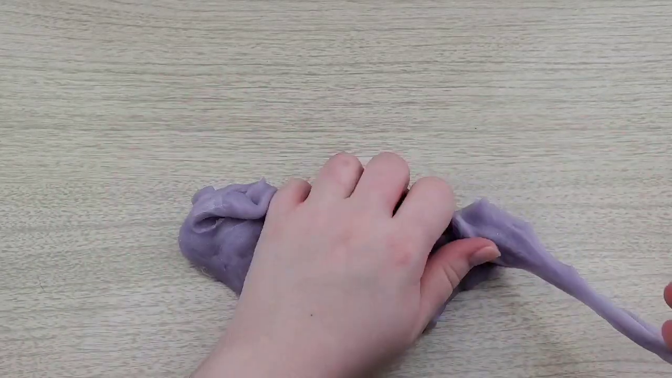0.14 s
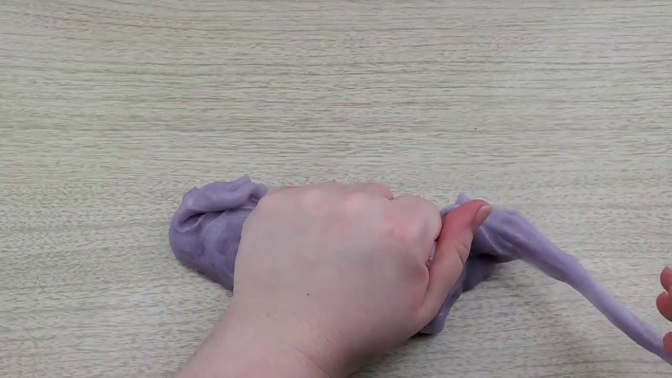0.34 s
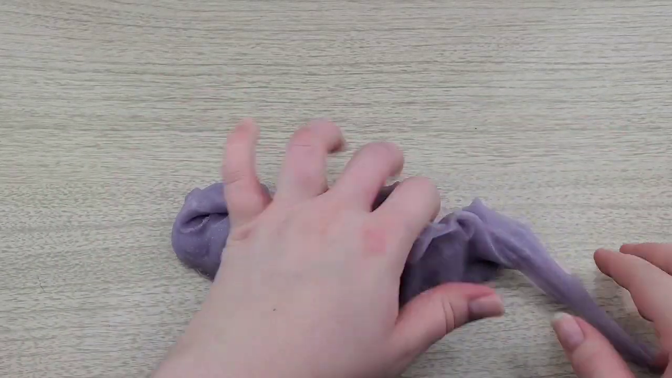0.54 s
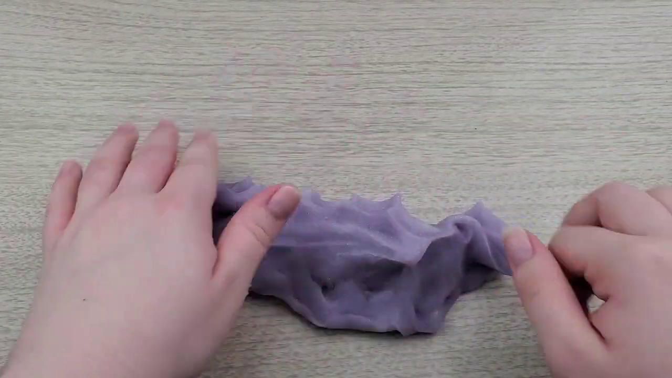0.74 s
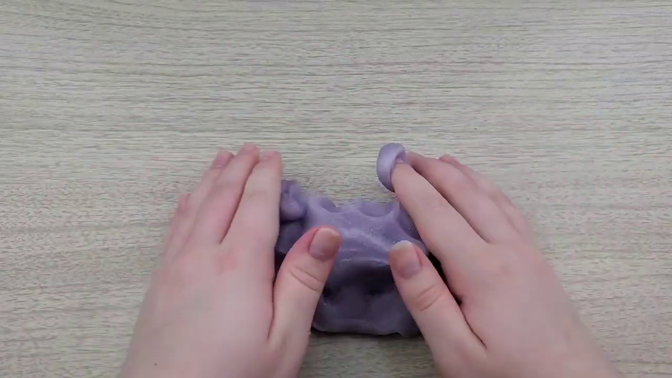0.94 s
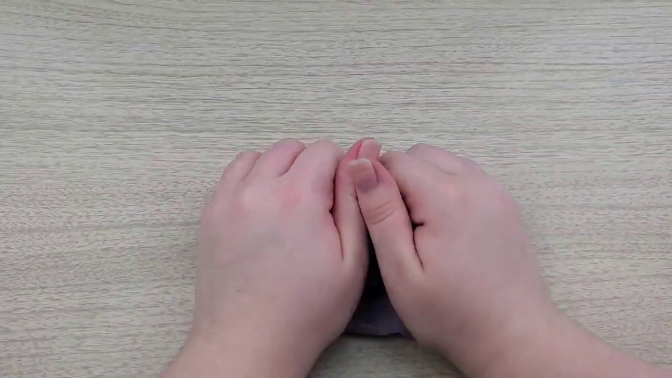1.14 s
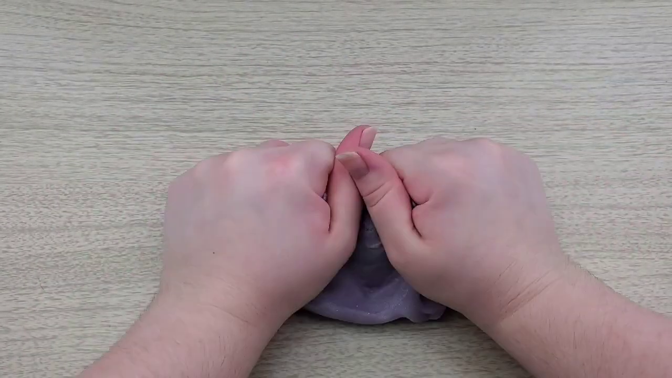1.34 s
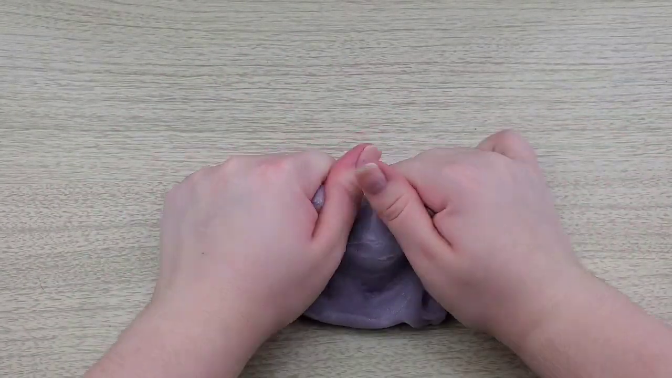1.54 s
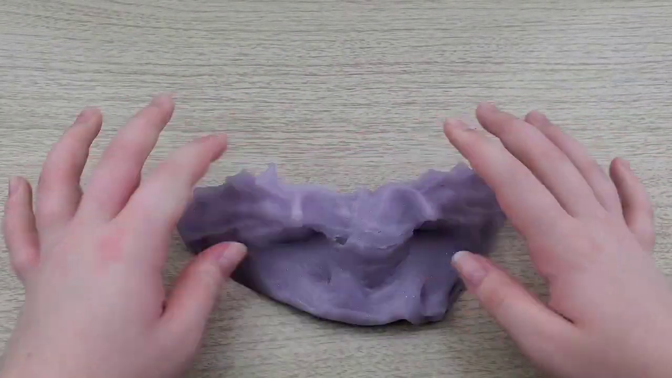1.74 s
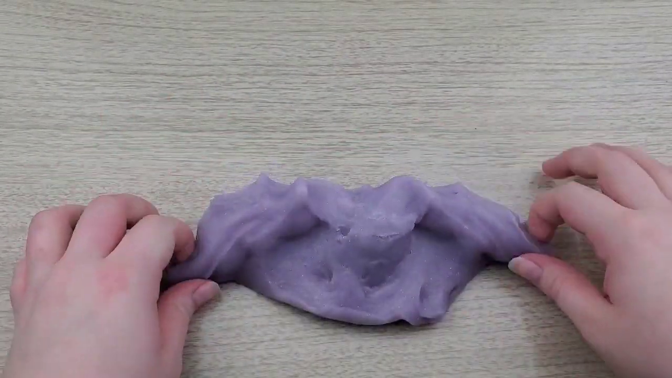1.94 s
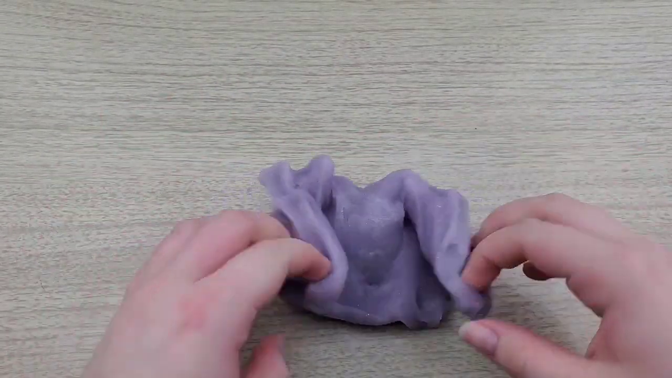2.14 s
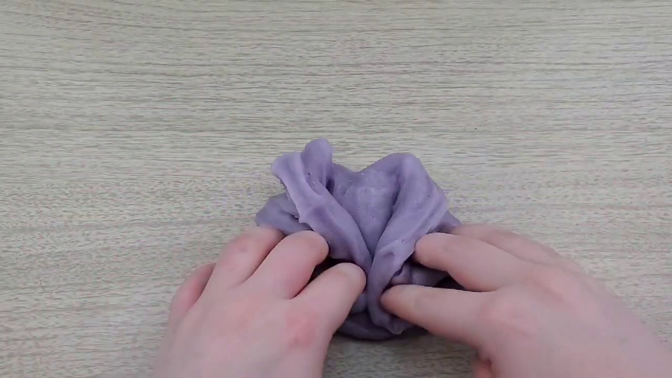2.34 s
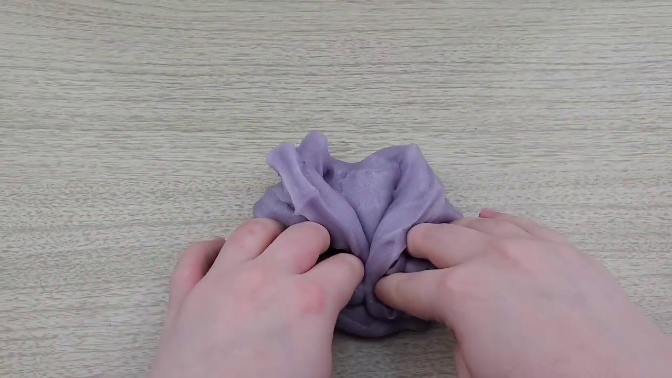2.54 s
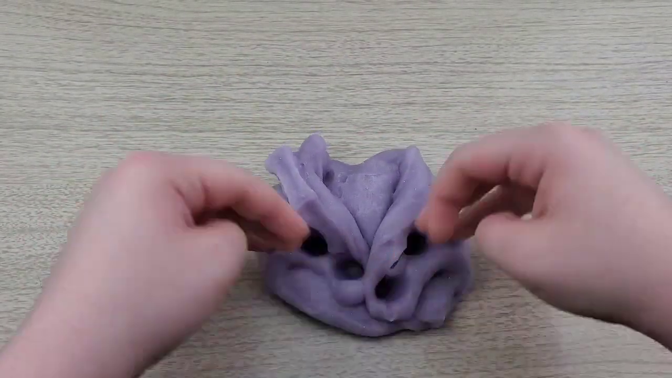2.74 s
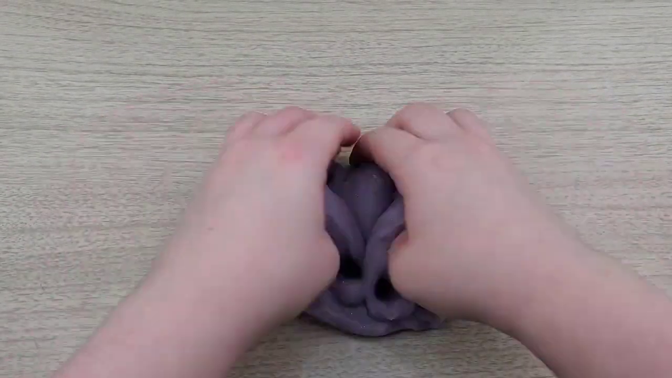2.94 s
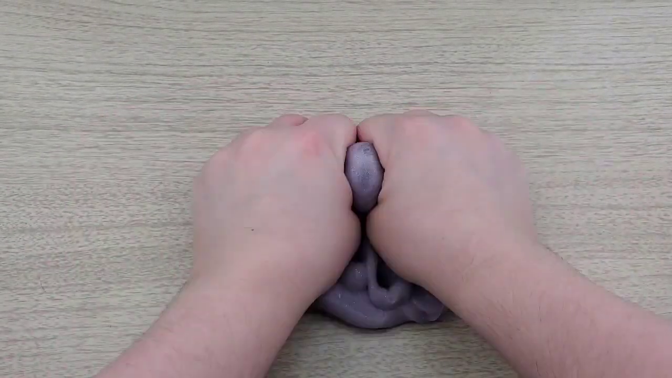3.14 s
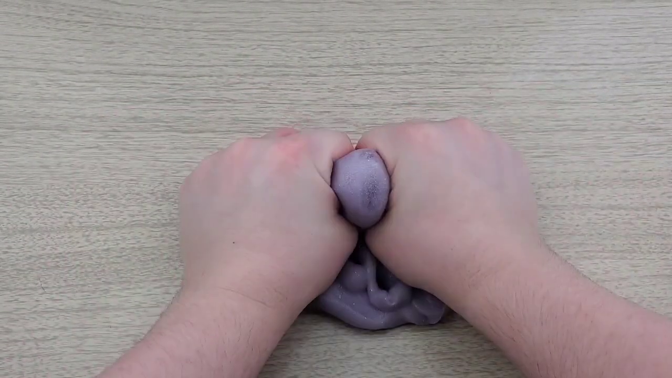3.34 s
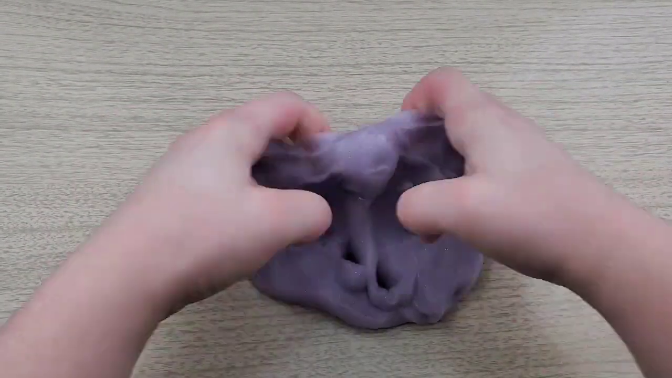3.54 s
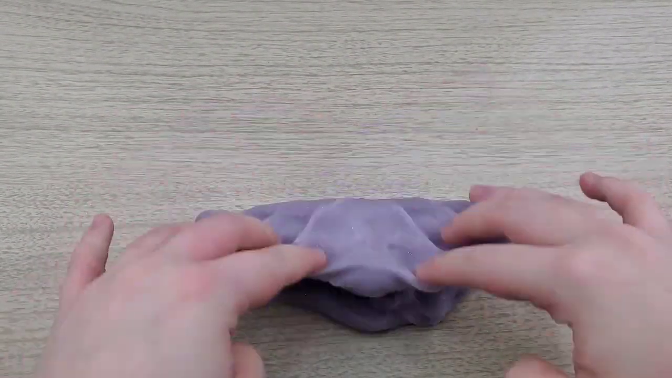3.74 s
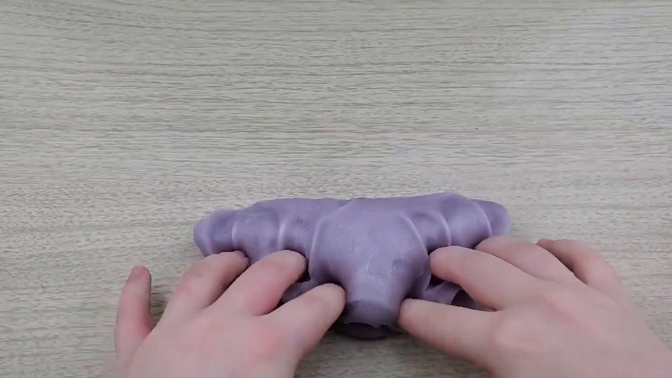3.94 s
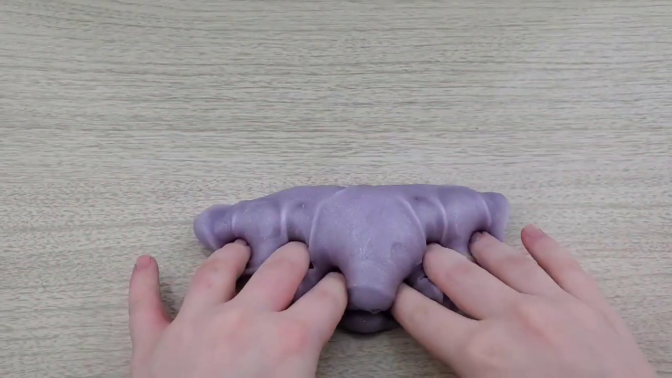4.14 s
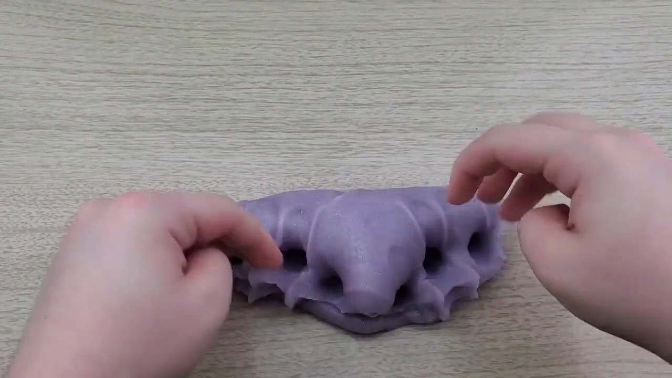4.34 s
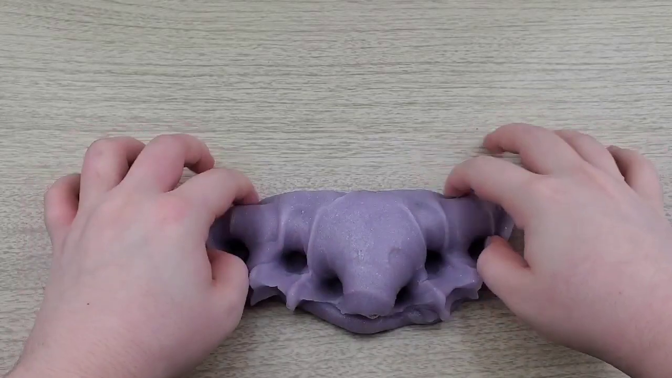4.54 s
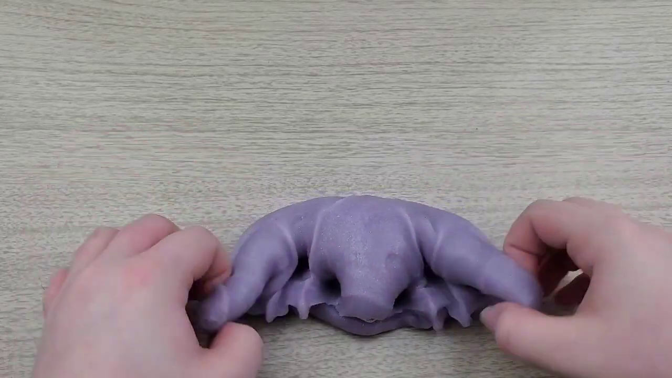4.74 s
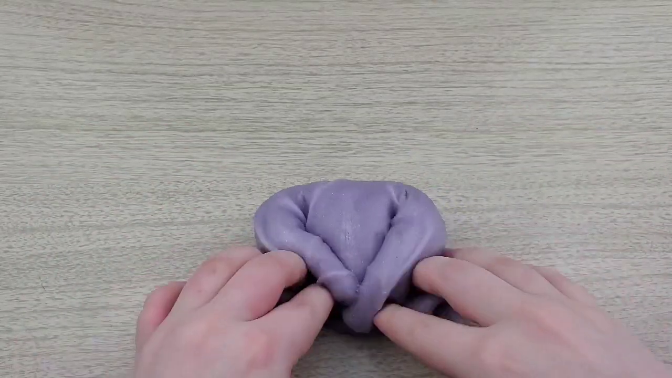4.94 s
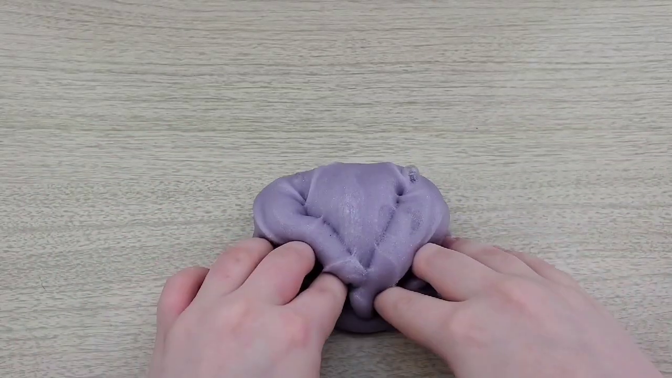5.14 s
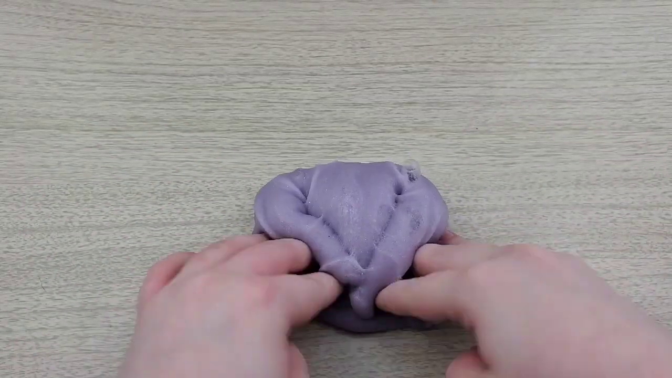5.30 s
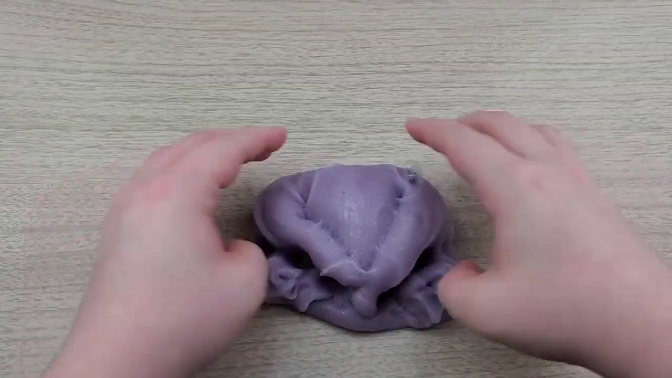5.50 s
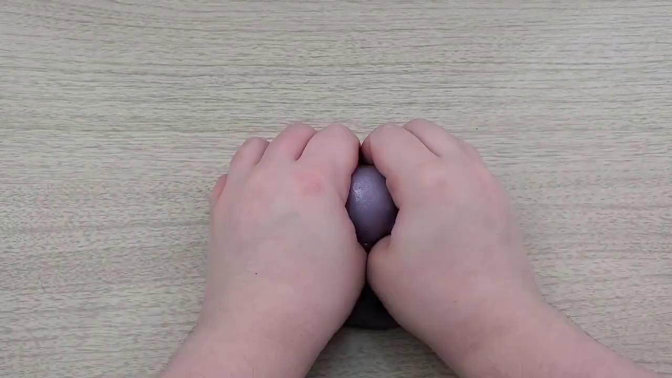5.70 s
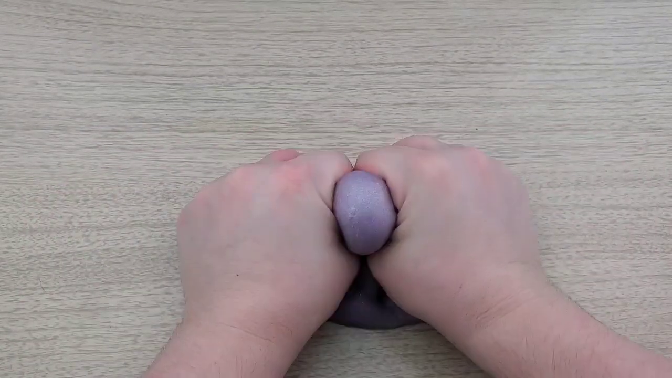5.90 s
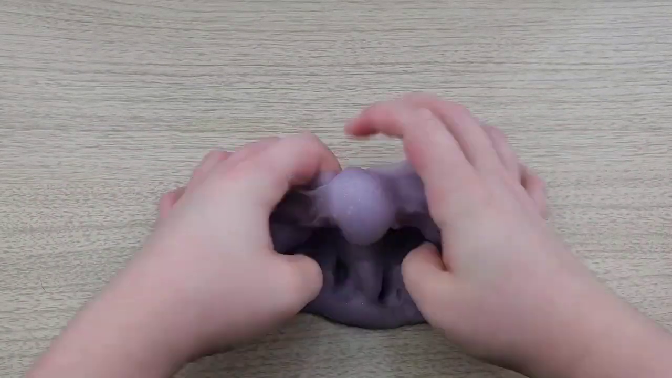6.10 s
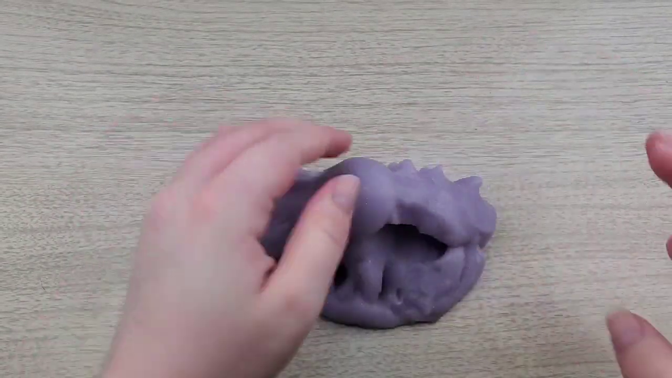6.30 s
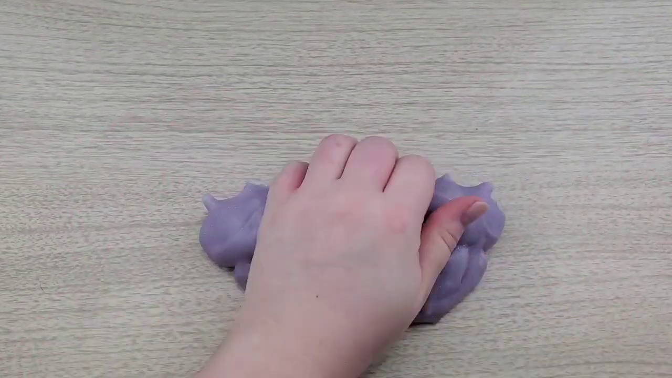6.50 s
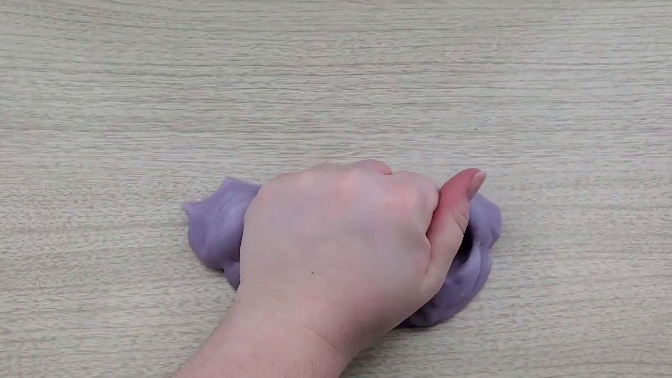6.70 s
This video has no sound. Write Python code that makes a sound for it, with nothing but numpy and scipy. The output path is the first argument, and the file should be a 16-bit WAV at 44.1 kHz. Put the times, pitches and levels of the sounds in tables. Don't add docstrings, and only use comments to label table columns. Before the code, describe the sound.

A close stereo microphone in a small quiet room catches hands working thick slime on a wooden table. After a nearly silent start, a dense cluster of loud wet snaps and pops bursts at 0.35-0.55 s with a soft table knock. Bubbly squish follows around 0.7 s, a pop at 1.26, fine crackles at 1.4-1.65 and a small bubbling squelch at 1.8. It is very quiet, with tiny ticks, until sharp pops at 2.9 s. Low thumps and blister crackles lead to snaps at 3.3-3.4 and a sticky, hollow squelch at 3.6-3.75. Another quick pop group lands at 4.45-4.5, faint seeping follows, then pops at 5.5. The loudest, juiciest bursts come at 5.9-6.1, with peeling and bubbles to 6.3. A last squish and snap arrive at 6.8-6.85 over faint hum and rumble.

```python
import sys
import numpy as np
from scipy import signal
from scipy.fft import rfft, irfft
from scipy.io import wavfile
from scipy.ndimage import uniform_filter1d

SR = 44100
rng = np.random.default_rng(int(sys.argv[2]) if len(sys.argv) > 2 else 0)


def amplitude_ratio(level_db):
    exponent = np.asarray(level_db, float) / 20
    return 10 ** exponent


def store_wav(level_fs):
    pcm = np.round(np.clip(np.atleast_2d(level_fs), -1, 1) * 32767)
    wavfile.write(sys.argv[1], SR, pcm.T.astype(np.int16))


N = 302526
MILLIS = np.arange(0, N / SR + .01, .001)
PORT_LAG_S = .00008
GESTURE_ROUND = 2.2
MIRROR = np.array([[1], [-1]])


def band(x, lo_hz, hi_hz, order=2):
    sos = signal.butter(order, [lo_hz, min(hi_hz, .47 * SR)], "band", fs=SR, output="sos")
    return signal.sosfilt(sos, x)


def fade(t60_s, size):
    return np.exp(-np.log(1000) * np.arange(size) / (t60_s * SR))


def unit(x):
    return x / np.sqrt(np.mean(x ** 2))


def add(out, start_s, x, peak_db):
    travel_s = .0008
    i = int((start_s + travel_s) * SR)
    x = x[..., :N - i]
    out[:, i:i + x.shape[-1]] += amplitude_ratio(peak_db + 4.0) * x / np.abs(x).max(1).mean()


def walk(rate_hz):
    k = int(SR / rate_hz)
    steps = np.repeat(rng.standard_normal(N // k + 1), k)
    smooth = uniform_filter1d(uniform_filter1d(steps, k), k)
    return unit(smooth[:N])


def crackle(per_s, spread_db, apart, wash):
    hits = rng.random((3, N)) < per_s / SR
    size_db = spread_db * np.minimum(rng.exponential(size=(3, N)), 3)
    clicks = hits * amplitude_ratio(size_db) * np.clip(rng.standard_normal((3, N)), -2, 2)
    clicks = unit(clicks) + wash * rng.standard_normal((3, N))
    return clicks[0] + apart * clicks[1:]


def humps(peak_s, swell_s, fade_s, level_db, round_top):
    late_s = MILLIS - peak_s[:, None]
    span = np.where(late_s < 0, -late_s / swell_s[:, None], late_s / fade_s[:, None])
    return amplitude_ratio(level_db[:, None] - 20 * span ** round_top)


def control(gain):
    return np.interp(np.arange(N) / SR * 1000, np.arange(len(gain)), gain)


def air(t):
    # freq_hz, density_db (per Hz)
    spectrum = np.array([(15, -45.5), (25, -16), (41, -3), (65, -7), (95, -14.5), (159, -30), (238, -17.5),
                         (296, -14.5), (410, -32), (1120, -57), (16500, -61)])
    # freq_hz, level_db
    hum_lines = [(190, -88.5), (238, -89), (286, -85)]
    tone_db = -75.5 + 1.0
    f_hz = np.fft.rfftfreq(N, 1 / SR) + 1
    shape = amplitude_ratio(np.interp(np.log(f_hz), np.log(spectrum[:, 0]), spectrum[:, 1]))
    mid, side = rfft(rng.standard_normal((2, N))) * shape
    tone = irfft(mid + np.clip(f_hz / 1500, .15, 1) * side * MIRROR, N)
    hum = 0
    for hz, level_db in hum_lines:
        gain = amplitude_ratio(level_db + 7.5 + 0.76 * walk(8.2))
        hum = hum + gain * np.sin(2 * np.pi * hz * t + 0.44 * walk(1.4))
    return unit(tone) * amplitude_ratio(tone_db) + hum


def peel():
    # peak_s, swell_s, fade_s, crackle_db, hollow_db (re crackle)
    peels = [(0.005, 0.071, 0.053, -83.5, -4), (.335, 0.034, 0.065, -77, -7), (0.488, 0.098, 0.12, -46, -5),
             (1.081, 0.057, 0.074, -86.5, -31), (0.70, 0.065, 0.084, -59.5, 5.5),
             (0.763, 0.083, 0.041, -59, -3), (1.249, 0.14, 0.099, -74.5, -14), (1.55, 0.37, 0.11, -64, -2),
             (1.76, 0.036, 0.065, -57.5, -0.5), (1.845, 0.098, 0.1, -53.5, -1.5),
             (2.119, 0.056, 0.053, -72.5, -4), (2.29, 0.062, 0.092, -66.5, -9), (2.19, 0.043, .06, -80, -7),
             (2.518, 0.12, 0.16, -80, -2), (3.189, 0.044, 0.19, -62.5, 2.5),
             (3.44, 0.072, 0.099, -53, -10.5), (3.654, 0.013, 0.097, -47.5, 3.5),
             (3.739, 0.11, 0.11, -51.5, 1), (4.05, 0.28, 0.54, -85, -3.5), (4.776, 0.03, 0.075, -65.5, -14),
             (4.901, 0.14, 0.33, -74.5, -13.5), (5.229, 0.094, 0.1, -83, -4.5),
             (5.885, 0.15, 0.2, -78, -10), (6.1, 0.21, 0.11, -46, -1.5), (6.287, 0.071, 0.089, -48.5, 2.5),
             (6.626, 0.015, 0.32, -80.5, -12.5), (6.797, 0.03, 0.042, -54, -6),
             (2.887, 0.01, 0.01, -47.5, -5), (3.361, .04, 0.037, -61.5, -2)]
    # peak_s, swell_s, fade_s, hollow_db
    seeps = [
        (1.13, 0.045, 0.09, -84.5),
        (2.681, 0.2, 0.33, -82.5),
        (3.381, 0.14, .12, -62.5),
        (4.76, 0.028, 0.068, -75),
        (5.38, 0.15, 0.18, -96),
        (5.72, 0.087, 0.055, -89.5),
    ]
    # centre_hz, width_hz, level_db
    folds = [(950, 290, -2.5), (1480, 520, 2), (2220, 690, -1.5), (536, 830, -2.5)]
    rest, patchy_db, sheen_db = amplitude_ratio(-94.5), 3, 4
    peak_s, swell_s, fade_s, crackle_db, hollow_db = np.transpose(peels)
    pull = humps(peak_s, swell_s, fade_s, crackle_db, GESTURE_ROUND)
    threads = crackle(2500, 2.4, 2.6, .9) * amplitude_ratio(2.6 * walk(60))
    gulps = crackle(540, 2.4, 1.0, 0.9)
    hollow = 0
    for hz, width_hz, level_db in folds:
        ring = unit(band(gulps, hz - width_hz / 2, hz + width_hz / 2, order=1))
        hollow = hollow + amplitude_ratio(level_db + patchy_db * walk(45)) * ring
    skin_gain = control(pull.sum(0) + rest)
    seep = humps(*np.transpose(seeps), GESTURE_ROUND).sum(0)
    fold_gain = control(amplitude_ratio(hollow_db) @ pull + seep + rest)
    bright = unit(band(threads, 4600, 8500)) + amplitude_ratio(sheen_db) * unit(band(threads, 6300, 17000))
    return amplitude_ratio(1.0) * (skin_gain * bright + fold_gain * unit(hollow))


def rumble():
    # peak_s, rumble_db, fade_s
    leans = [(0.02, -68, 1.6), (1.26, -75, 1.6), (1.83, -64, 0.61), (2.12, -66, 1.6), (2.94, -48, 0.14),
             (3.17, -56, 0.85), (3.7, -54.5, 0.24), (4.2, -68, 0.68), (4.51, -50.5, 0.14),
             (4.771, -55.5, 0.11), (5.05, -69, 1.2), (5.62, -50, 0.057), (5.809, -58, 0.35),
             (6.84, -58, 0.046)]
    swell_s, rest_db = 0.092, -76.5
    mid = unit(band(rng.standard_normal(N), 41.0, 98.4))
    side = unit(band(rng.standard_normal(N), 35, 63))
    peak_s, level_db, fade_s = np.transpose(leans)
    load = humps(peak_s, np.full(len(peak_s), swell_s), fade_s, level_db, 0.87).sum(0) + amplitude_ratio(rest_db)
    return control(load) * amplitude_ratio(-1.5) * (mid + 0.21 * side * MIRROR)


def pockets():
    # start_s, snap_db, snap_hz, pocket_hz, pocket_db (re snap)
    bursts = [(.394, -16.5, 5670, 3000, -47), (.4052, -15, 5600, 878, -15.5),
              (.4204, -15.5, 7500, 855, -28), (.4293, -16, 8060, 2315, -19), (.5579, -35, 5400, 1570, -12),
              (.5771, -29.5, 7880, 940, -30), (1.2611, -34.5, 4860, 1250, -18.5),
              (2.9143, -14.5, 5600, 941, -4), (2.9224, -19.5, 5120, 930, -19),
              (3.2856, -22.5, 9500, 2166, -20.5), (3.6571, -26, 3430, 3030, -11.5),
              (3.677, -20.5, 5300, 926, -10.5), (3.7065, -24, 3450, 916, -9.5),
              (4.4496, -21.5, 4680, 628, -13.5), (4.9918, -45.5, 6640, 1480, -23),
              (5.527, -18, 4800, 944, -13), (5.542, -15.5, 6780, 1250, -11), (5.9382, -12.5, 4050, 1775, 4),
              (5.9623, -6.5, 3680, 1927, -11.5), (6.0007, -6, 4750, 2967, -18),
              (6.0186, -9.5, 4380, 2197, -26), (6.2998, -29, 3000, 1208, -7.5)]
    # start_s, snap_db, snap_hz, pocket_hz, pocket_db (re snap)
    spits = [(0.383, -31.5, 4850, 910, -17.5), (0.445, -19, 4950, 1490, -13), (0.457, -13, 7500, 870, -42),
             (0.473, -20.5, 8400, 2180, -30), (0.5264, -39, 4470, 960, 1),
             (1.4214, -34.5, 7710, 1533, -12.5), (1.4396, -36, 7140, 1480, -19),
             (1.4794, -30, 7800, 1600, -18.5), (1.5729, -35, 6800, 2100, -28),
             (1.5871, -28.5, 7390, 3120, -18.5), (2.889, -14.5, 5400, 980, -15),
             (3.6047, -20, 8430, 2734, -29.5), (4.461, -17.5, 4210, 668, -13.5),
             (4.4745, -24.5, 3640, 606, -34), (4.4859, -15.5, 4870, 640, -15),
             (4.886, -41.5, 6460, 1470, -20.5), (5.5145, -29.5, 5440, 1290, -8.5),
             (5.5524, -22.5, 4000, 692, -3.5), (5.8958, -36, 5670, 3100, -13),
             (6.0375, -18, 8200, 1880, -19), (6.8506, -31, 5490, 1200, -8), (6.0538, -16, 5300, 2220, -7.5),
             (6.6133, -40.5, 7000, 926, -25), (6.7896, -44, 6020, 855, 4.5)]
    # start_s, snap_db, snap_hz, pocket_hz
    blisters = [(1.0301, -61.5, 7100, 955), (1.5248, -44.5, 4130, 1580), (1.6287, -43.5, 4560, 2760),
                (1.651, -41.5, 4130, 2210), (2.0681, -68, 7820, 1620), (2.438, -67, 5530, 900),
                (2.471, -60.5, 4840, 831), (2.4914, -67, 5200, 910), (2.5368, -67, 5420, 908),
                (2.5691, -58.5, 5220, 944), (3.1661, -41, 8100, 655), (3.2184, -47.5, 7600, 1470),
                (3.3721, -35, 6000, 2000), (3.399, -36, 8330, 1800), (3.4124, -27, 8100, 2220),
                (3.455, -36, 6900, 1620), (3.491, -37.5, 8800, 1530), (4.0313, -63, 6800, 597),
                (4.388, -67.5, 7530, 628), (5.04, -56.5, 7930, 1178), (5.1501, -60.5, 7250, 858),
                (5.19, -73, 5500, 884), (5.224, -63.5, 5010, 868), (5.7729, -47, 7750, 1466),
                (5.8132, -45, 8300, 1370), (5.861, -62.5, 3440, 2220), (6.0986, -11.5, 7200, 1076),
                (6.6272, -51, 6380, 890), (6.691, -57, 6380, 960), (6.7603, -58.5, 9500, 967),
                (5.252, -69, 5200, 1250), (2.585, -67.5, 9000, 910), (2.633, -67, 5980, 932),
                (6.816, -42.5, 6900, 910), (6.724, -63, 6000, 900)]
    # start_s, snap_db, snap_hz, pocket_hz
    gulps = [(0.3633, -57.5, 4670, 856), (1.322, -54, 6250, 1530), (1.3957, -52, 3480, 2540),
             (1.8051, -35.5, 3100, 1550), (2.7462, -64.5, 3140, 2110), (2.7854, -66.5, 3060, 930),
             (2.877, -40.5, 5150, 1221), (3.1413, -42, 4060, 670), (3.239, -43, 6880, 1990),
             (3.3368, -43, 3260, 2100), (4.1151, -62.5, 8080, 1604), (4.7275, -49.5, 3300, 680),
             (4.79, -76, 5400, 2600), (6.8143, -48, 5500, 996), (6.8502, -19, 5070, 2530),
             (1.369, -58, 3750, 1940), (1.388, -56, 3200, 2300), (1.4317, -51.5, 3600, 1500),
             (1.454, -52, 3780, 2020), (3.176, -49, 3000, 1300), (3.315, -48, 3300, 2200),
             (3.423, -42.5, 3460, 1710), (6.076, -32, 3300, 600), (6.304, -39, 3700, 2820),
             (6.27, -34, 3200, 2150)]
    sheens_db = (-17, -5.5, -0.5, -21.5)
    blister_ring_db, gulp_ring_db = -20, -5.5
    blisters = [(*row, blister_ring_db) for row in blisters]
    gulps = [(*row, gulp_ring_db) for row in gulps]
    kinds = zip([bursts, spits, blisters, gulps], sheens_db)
    return [(*row, sheen_db) for rows, sheen_db in kinds for row in rows]


def pops():
    tear_t60_s, snap_t60_s, ring_t60_s = 0.037, 0.0023, 0.022
    glide, apart, slosh_gain = 0.073, 2.2, 1.1
    ring_lead_s = .00005
    out, size = np.zeros((2, N)), 3000
    t = np.arange(size) / SR
    tear = fade(tear_t60_s, size) + 0.7 * fade(snap_t60_s, size)
    onset = 1 - np.exp(-t / .0003)
    for start_s, snap_db, snap_hz, pocket_hz, pocket_db, sheen_db in pockets():
        chance = rng.standard_normal((4, size))
        fray = (chance[0] + apart * chance[1:3]) * amplitude_ratio(4.8 * chance[3]) * tear * onset
        add(out, start_s, band(fray, snap_hz / 1.242, snap_hz * 1.304), snap_db - 4.0)
        add(out, start_s, band(fray, snap_hz / 2.3, snap_hz / 1.714), snap_db - 18.0)
        add(out, start_s, band(fray, 8000, 17000, order=3), snap_db + sheen_db + 5.5)
        phase = 2 * np.pi * pocket_hz * (t - glide * 0.0026 * (1 - np.exp(-t / 0.0005)))
        port_phase = .25 * MIRROR * (chance[3, 1] / 1500 + 4 * np.pi * ring_lead_s) * pocket_hz
        ring = np.sin(phase + port_phase) * fade(ring_t60_s, size)
        ring = band(ring, 300, 9000)
        slosh = band(fray + 1.5 * fray.mean(0), pocket_hz / 1.76, pocket_hz * 1.75)
        cavity = ring + slosh_gain * slosh / np.abs(slosh).max()
        add(out, start_s, cavity, snap_db + pocket_db + 3.0)
    return out


def cracks():
    # start_s, level_db, centre_hz, pan_db (left minus right), late_us (left port)
    films = [(.3833, -23, 7000, 0, 20), (.3935, -11, 6000, -3, 20), (.4044, -9, 5200, -5, 40),
             (.4209, -18, 7200, -5, 0), (.4571, -12, 6500, -6, 0), (1.2617, -27, 4900, -6, -20),
             (1.4232, -37, 12000, 3, 0), (1.4397, -38, 12000, -3, 60), (1.479, -36, 11000, 0, -20),
             (1.5734, -35, 11500, 0, 60), (1.587, -29, 12000, -5, -20), (1.631, -38, 12000, -2, 0),
             (1.6524, -29, 12000, 0, 20), (2.8898, -16, 5000, 2, -40), (2.9144, -12, 5000, 2, 20),
             (2.9228, -20, 6000, -3, 0), (3.1675, -31, 12000, 6, 0), (3.2855, -14, 8000, 2, 0),
             (3.4118, -13, 12000, 4, 0), (3.6786, -15, 5900, 2, -20), (4.4495, -23, 5900, 2, -20),
             (4.4612, -17, 5200, -2, -70), (4.486, -11, 5500, -2, -90), (4.8867, -42, 12000, -5, 0),
             (4.9928, -44, 6000, 2, 0), (5.151, -55, 12000, 0, 0), (5.5291, -20, 4900, 0, -70),
             (6.0012, -9, 5700, 0, -70), (6.0022, -6, 5700, -1, 0), (6.0542, -15, 6000, -2, -70),
             (6.0986, -14, 12000, 1, -40), (6.8497, -21, 4650, -2, 40)]
    t60_s, span, body_db = .0035, 1.3, -15
    apart, lead = 0.8, 3
    out, size = np.zeros((2, N)), 400
    for start_s, level_db, hz, pan_db, late_us in films:
        chance = rng.standard_normal((3, size))
        chance[0, 0] = lead
        burst = (chance[0] + apart * chance[1:]) * fade(t60_s, size)
        burst = np.pad(burst, ((0, 0), (8, 8)))
        ring = band(burst, hz / span, hz * span)
        body = band(burst, 800, hz / span, order=1)
        left, right = ring + amplitude_ratio(body_db) * body * np.abs(ring[0]).max() / np.abs(body).max()
        left = np.roll(left, round((late_us * 1e-6 + PORT_LAG_S) * SR))
        ports = np.array([left / np.abs(left).max(), right / np.abs(right).max()])
        add(out, start_s, ports * amplitude_ratio(pan_db * MIRROR / 2), level_db - 1.5)
    return out


def knocks():
    # start_s, deep_db, upper_db (re deep)
    presses = [(0.402, -33, 2.5), (0.421, -36.5, 2), (0.526, -54.5, 9), (2.877, -42, -2.5),
               (2.889, -37, 6.5), (2.913, -36.5, 15), (2.926, -41.5, 16), (3.141, -30, -7),
               (3.166, -34.5, -15), (3.656, -42, 6), (3.677, -36, 0), (3.706, -38.5, -1), (4.45, -37, -4),
               (4.461, -38.5, -1), (4.473, -30.5, 3.5), (4.485, -34.5, 10), (4.727, -42, -4.5),
               (5.517, -55.5, 5), (5.528, -50, 11), (5.55, -33, 3), (5.938, -34, 11.5), (5.961, -36, 7.5),
               (6.05, -39.5, 9.5), (6.095, -62, 4), (6.265, -53.5, 14.5), (6.3, -63, -3),
               (6.79, -39.5, 0.5), (6.851, -46.5, 17.5)]
    # freq_hz, level_db, t60_s
    table_modes = [(254, 1.5, 0.019), (335.1, -3, 0.34), (443, -7, 0.15), (490, -7.5, 0.15), (668, 0, 0.12),
                   (856, -2.5, 0.093), (899, 0.5, 0.13), (1250, -12, 0.18)]
    wobble, push_t60_s, longest_ring_s = 0.52, .19, .11
    detune, spot_spread_db = .01, 1.6
    out, size = np.zeros((2, N)), 9000
    t = np.arange(size) / SR
    for start_s, deep_db, upper_db in presses:
        chance = rng.standard_normal((len(table_modes), 3))
        rings = []
        for (hz, mode_db, t60_s), (spot, pitch, side) in zip(table_modes, chance):
            phase = 2 * np.pi * hz * (1 + detune * pitch) * t + hz / 2500 * side * MIRROR
            gain = amplitude_ratio(mode_db + spot_spread_db * spot)
            rings.append(gain * np.sin(phase) * fade(min(t60_s, longest_ring_s), size))
        rings = np.array(rings)
        push = wobble * rng.standard_normal(size) * fade(push_t60_s, size)
        push[:40] += np.hanning(40)
        deep, upper = rings[:2].sum(0), rings[2:].sum(0)
        for modes, level_db in [(deep, deep_db - 6.0), (upper, deep_db + upper_db - 6.5)]:
            pushed = signal.fftconvolve(modes, push[None], axes=1)[:, :size]
            add(out, start_s, band(pushed, 270, 1900, order=3), level_db)
    return out


def bubbles():
    # start_s, level_db, pitch_hz
    blips = [(0.71, -44, 1209), (0.734, -44, 876), (0.747, -42, 1410), (0.764, -54, 1680),
             (1.369, -66.5, 1750), (1.768, -45, 1200), (1.795, -39, 1493), (1.824, -46, 1440),
             (1.845, -37, 1420), (1.864, -43, 1914), (2.111, -61, 1550), (2.127, -58.5, 900),
             (2.671, -68, 1182), (4.77, -49.5, 1448), (4.8, -59, 1440), (4.82, -61, 852),
             (4.953, -64, 1371), (5.024, -69, 1480), (5.19, -73.5, 1480), (5.251, -65.5, 1250),
             (6.245, -37, 1480), (6.27, -34, 1100), (6.744, -63, 910)]
    t60_s, rise_per_s, onset_s = 0.02, 2.5, 0.0013
    out, size = np.zeros((2, N)), 2500
    t = np.arange(size) / SR
    for start_s, level_db, hz in blips:
        port_phase = .4 * MIRROR * rng.standard_normal()
        ring = np.sin(2 * np.pi * hz * t * (1 + rise_per_s * t) + port_phase)
        add(out, start_s, ring * fade(t60_s, size) * (1 - np.exp(-t / onset_s)), level_db - 8.5)
    return out


def squishes(t):
    # peak_s, half_s (half length), level_db, fold_hz, glide_hz_per_s
    squeezes = [(0.737, 0.033, -52, 1100, 10997.5), (1.82, 0.064, -45, 1500, 2502),
                (4.793, 0.067, -80, 1700, 0), (4.96, 0.12, -86, 1450, 198), (5.221, 0.093, -81, 1100, -500),
                (5.983, 0.043, -33, 1750, 499.5), (6.809, 0.039, -50, 670, -3000),
                (6.268, 0.012, -43, 3600, -0.5), (3.699, 0.1, -60.5, 1500, 0),
                (3.719, 0.045, -44, 2700, -0.5), (4.2, .05, -75.5, 520, 0), (6.856, 0.017, -62, 2700, 0)]
    width_hz = 550
    out = np.zeros((2, N))
    flow = unit(band(crackle(500, 5.3, 0.88, 0.43), 12, width_hz))
    for peak_s, half_s, level_db, hz, glide in squeezes:
        i, j = max(int((peak_s - 2 * half_s) * SR), 0), int((peak_s + 2 * half_s) * SR)
        late_s = t[i:j] - peak_s
        tone = np.sin(2 * np.pi * (hz * late_s + glide * late_s ** 2 / 2))
        out[:, i:j] += amplitude_ratio(level_db - 20 * (late_s / half_s) ** 2) * flow[:, i:j] * tone
    return out


def ticks():
    # start_s, level_db, low_edge_hz (bottom of the snap's band)
    snaps = [(1.0997, -66, 7500), (1.1694, -55.5, 9000), (1.2204, -57.5, 3940), (1.2944, -47, 4450),
             (2.111, -63, 3740), (2.1496, -70, 7440), (2.2695, -53, 6830), (2.3084, -56.5, 7060),
             (2.43, -59.5, 4720), (2.48, -56, 4250), (2.5134, -62.5, 5510), (2.6094, -61, 6550),
             (2.6252, -66, 7280), (2.654, -66, 4750), (2.732, -74, 3920), (3.3565, -39.5, 6990),
             (3.929, -71, 5010), (3.9788, -71.5, 7840), (4.15, -61, 4360), (4.2194, -79, 4390),
             (4.7901, -41.5, 5440), (4.824, -60.5, 7500), (4.9344, -61, 7140), (5.0582, -66, 4950),
             (5.2092, -54.5, 4700), (5.2355, -60.5, 4720), (5.79, -62, 8510), (5.8292, -57.5, 9410),
             (1.497, -46, 6000), (3.433, -36.5, 9000), (3.205, -50, 11000), (3.3385, -44, 12000),
             (1.396, -45, 9000)]
    t60_s = .012
    out, size = np.zeros((2, N)), 900
    for start_s, level_db, hz in snaps:
        snap = rng.standard_normal((2, size)) * fade(t60_s, size)
        add(out, start_s, band(snap, hz / 0.97, hz * 3.0, order=1), level_db - 5.5)
    return out


def room(x):
    bands = [(437, 0.42, -7), (1100, 0.15, -4.5), (2646, 0.21, -5), (4130, 0.24, -7), (7500, 0.28, -16),
             (15600, 0.25, -13.5)]
    gap_s = .002
    tail, lo_hz, size = 0, 150, 16000
    for hz, t60_s, level_db in bands:
        mid, side = band(rng.standard_normal((2, size)), lo_hz, hz) * fade(t60_s, size)
        both = mid + min((hz / 2500) ** 2.1, 1) * side * MIRROR
        scale = np.sqrt((hz - lo_hz) / SR / np.sum(mid ** 2))
        tail = tail + amplitude_ratio(level_db) * both * scale
        lo_hz = hz
    tail = np.pad(tail, ((0, 0), (int(gap_s * SR), 0)))
    return signal.fftconvolve(x, tail, axes=1)[:, :N]


def scene():
    t = np.arange(N) / SR
    around = rumble() + air(t)
    skin = peel() + squishes(t)
    table = knocks()
    slime = pops() + cracks() + bubbles() + ticks()
    near = slime + table + skin + room(slime + 1.2 * table + 0.37 * skin)
    left, right = near * amplitude_ratio(-.5 * MIRROR)
    right = np.roll(right, int(PORT_LAG_S * SR))
    return np.array([left, right]) + around


def roll_off(x):
    return signal.sosfilt(signal.butter(12, 16990, fs=SR, output="sos"), x)


def record(dry):
    ceiling, top_hz = .95, 15900
    rounded = np.tanh(dry / ceiling) * ceiling
    low_pass = signal.ellip(6, .2, 22, top_hz, fs=SR, output="sos")
    mix = signal.sosfilt(low_pass, rounded)
    return roll_off(mix)


dry = scene()
out = record(dry)
store_wav(out)
```